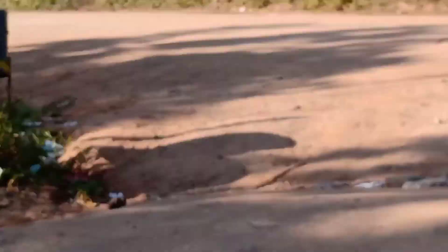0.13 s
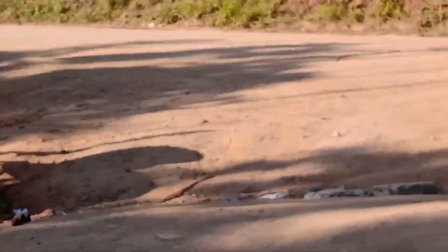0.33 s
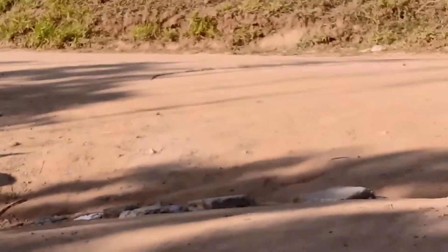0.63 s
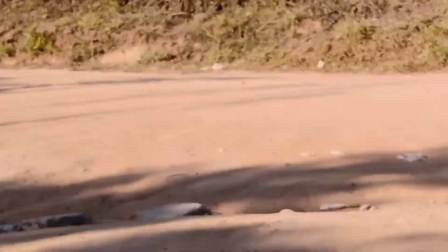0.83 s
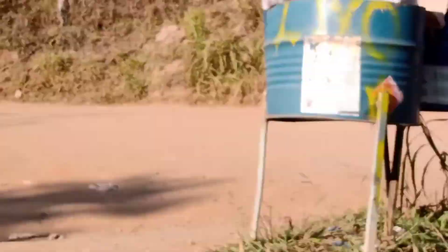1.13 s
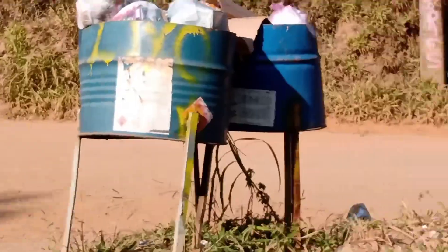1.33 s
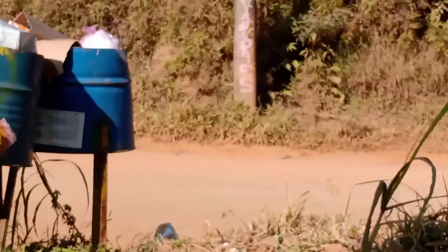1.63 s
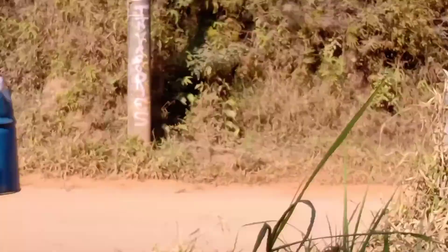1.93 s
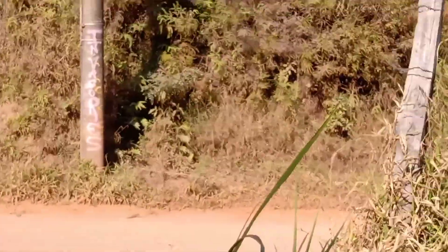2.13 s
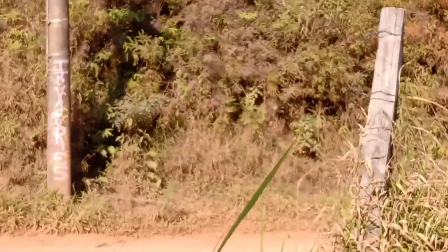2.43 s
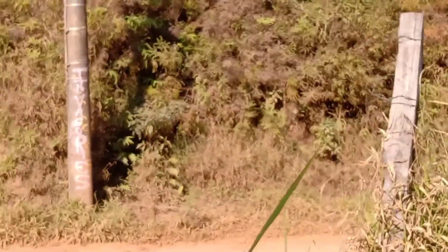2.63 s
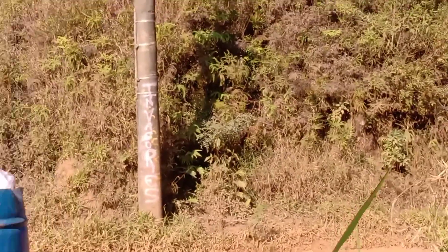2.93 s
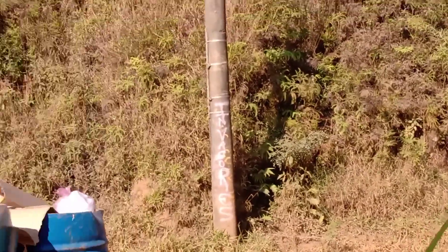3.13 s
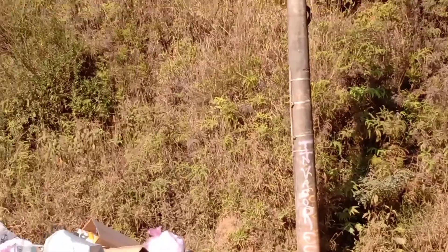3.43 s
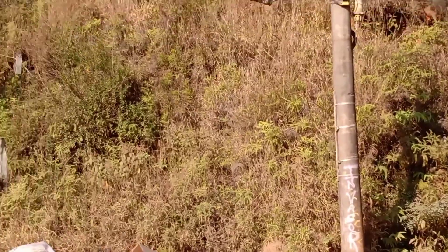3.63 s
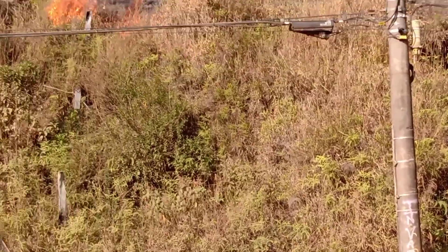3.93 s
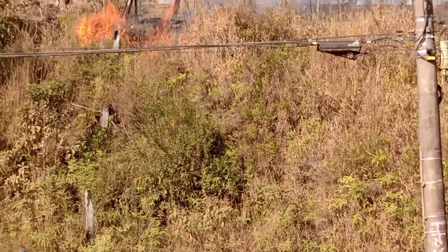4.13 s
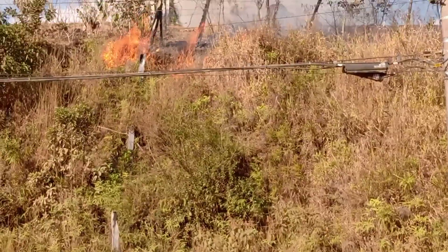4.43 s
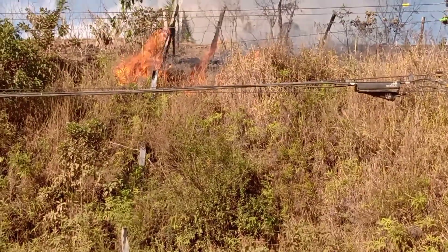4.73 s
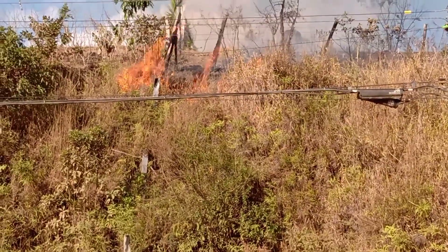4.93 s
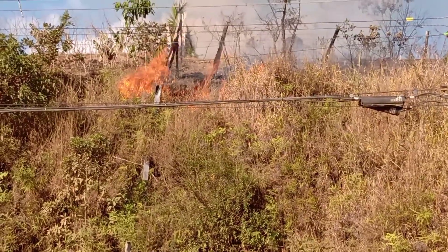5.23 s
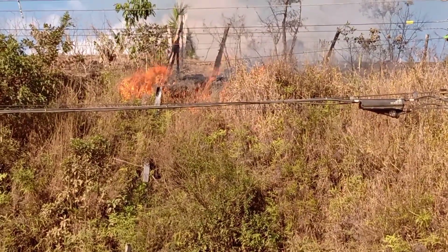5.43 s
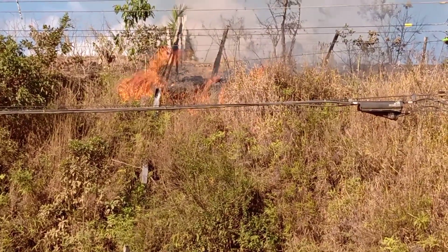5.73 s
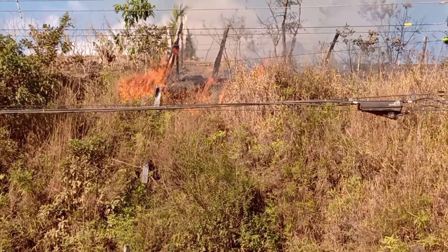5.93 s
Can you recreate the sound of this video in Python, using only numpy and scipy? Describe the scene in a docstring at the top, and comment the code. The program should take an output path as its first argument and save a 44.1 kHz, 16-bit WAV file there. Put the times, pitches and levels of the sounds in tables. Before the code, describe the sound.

Dry grass and brush burn outdoors with dense, irregular crackling and sharp pops over a soft hiss and a low rumble.

```python
"""Sharp pops and busy crackle: dry grass and brush burning up a slope, heard through the two microphone
ports of a turning hand-held camera. Each stalk bursts as a short pressure pulse with a bounce off the
ground and a scatter from the brush, and the slope throws back brief echoes. Swarms of tiny crackles,
sizzling grass blades and a soft hiss fill the gaps over a low outdoor rumble. Early on, the hand
bumps the camera a few times."""
import sys
import numpy as np
from scipy import signal
from scipy.fft import rfft, irfft
from scipy.io import wavfile
from scipy.ndimage import uniform_filter1d

SR = 44100
rng = np.random.default_rng(int(sys.argv[2]) if len(sys.argv) > 2 else 0)


def int16_out(signal):
    """Quantize to a 16-bit WAV file."""
    q = np.round(np.clip(np.atleast_2d(signal).T, -1, 1) * 32767)
    wavfile.write(sys.argv[1], SR, q.astype(np.int16))


N = 268569

# The featured bursting stalks. Each row: start in seconds, midrange level in dB, thump, fizz and sizzle
# in dB before band weighting, scatter in dB against the burst, ring pitch in Hz.
STALK_POPS = [(0.0092, -40.5, 10.5, -4, -10.0, 5, 865), (0.0177, -36, -3, -13, -9, -5, 1630),
              (0.0505, -66, -4, 7.0, 13.0, -3, 5640.0), (0.0572, -51, -10, -2, 7, -18, 840.0),
              (0.0619, -48, -10, 12, 22, -25, 9530.0), (0.078, -33.5, 2.5, -2.0, 17, 7, 2070.0),
              (0.0866, -57, -2, 0.0, 1.0, 3.0, 2500.0), (0.1108, -33.5, -1.5, 5, 13, -3, 790),
              (0.137, -30, -4, 12, 6, -15, 2860), (0.1566, -42, 1, 7, 11, 3, 5000),
              (0.1721, -44.5, 1, 14, 10, -1, 2630.0), (0.182, -39.5, -8, -1, 2, -7, 2000.0),
              (0.2172, -45, 3, 2, -9, -11, 2000), (0.224, -44, -11, -1, 1, 4, 2500),
              (0.2437, -38, -1, 7.0, 2, -3, 2150), (0.257, -35, -9.5, -2, 0, -6, 1480.0),
              (0.2685, -41.5, -0.5, 7, 8, 1, 760.0), (0.3654, -40, -1, 11, 5, 4, 1550),
              (0.3778, -39.5, -2, -11, -5, -15, 1980.0), (0.4127, -42.5, 3, 13, 8.0, 3, 1570.0),
              (0.4219, -47, 6, -1.0, -1, 18, 745), (0.4296, -43.5, 0, 18, 13, -2, 1480.0),
              (0.4438, -39.5, -5, 11, 14, 16, 8450), (0.5373, -46.5, 3.5, 10, 14, 20, 1480.0),
              (0.5683, -35.5, -13, 2, -1, -4, 1670), (0.5848, -38.5, -1, 12, 11, 12, 1980.0),
              (0.6015, -38, -2, 7, 9, 0, 7510.0), (0.6072, -44.5, 1, 1, -2, -4, 1110.0),
              (0.6205, -44, -8, 18, 22, -9, 5030), (0.6912, -41.0, -2, 3, 23, -5, 1880.0),
              (0.7, -41, 8, 18, 18, 12, 774), (0.709, -44, 5, 7, 15, 2, 800),
              (0.7214, -40, 6, -11, 6, 1, 776), (0.7412, -45, 1, 1, 4, -3, 770),
              (0.8019, -43.0, 3, 19, 18, 2, 7880.0), (0.8111, -41.5, -1, 5, 11, 0, 7160.0),
              (0.8583, -33.5, -6.5, 1, -2, 1, 5200), (0.8753, -49, -15, 14, 19, 1, 7000),
              (0.8856, -46.5, -14, 21, 26, -8, 7700), (0.9391, -30, -9.5, -1, -1, -9, 790),
              (1.0167, -48, -11, 21, 22, -11, 8300.0), (1.0441, -39, -6, 10, 6, -11, 1350.0),
              (1.0541, -26.5, -2, 6.5, -9, 6, 3070), (1.0893, -40, -7, 6, 9, 3, 4240.0),
              (1.117, -43, 0, 6, 7, 1, 1300), (1.1491, -44.5, -7, 22, 15, -5, 1880.0),
              (1.157, -47, -13, 21, 8.5, -18, 5920.0), (1.1796, -35.5, -4.5, -11, 3, 9, 1330),
              (1.1902, -32.5, -2, 19, 7, -1, 5750), (1.199, -35, -8, 6, 21, -9, 1270),
              (1.2052, -43, 0, 19, 1, -5.0, 2500.0), (1.2353, -48, -13.0, 14, 15, -10, 5380.0),
              (1.2776, -39, -13, 11.0, 3, -9, 2000.0), (1.3035, -46, -17, 17, 19, -6, 2170.0),
              (1.3224, -32.5, -10, 4, 4.0, 3, 1480), (1.3611, -49, -13.0, 14.0, 11.5, -2, 5920.0),
              (1.3657, -45, -16, 13, 23, -7, 7160.0), (1.373, -42, -5, 0, 7, 7, 1300.0),
              (1.3804, -37.5, -2, -6, 10.0, -2, 2020), (1.3896, -33, -6, 0, -9, -2, 740),
              (1.4127, -44, -16, 3, 3.0, 2, 4040.0), (1.4748, -44, -3, 2, 8, -0.0, 1880.0),
              (1.4951, -37.5, -4, 6, -6.0, 2, 2020), (1.5074, -38, -5, 5, -10, -12, 5920.0),
              (1.5134, -39.5, -4, 6, 14.5, -12, 6500), (1.5274, -44.5, 12, -6, -11, 1, 800),
              (1.5463, -38.5, -11, 0.0, 1.0, 0, 3500.0), (1.5559, -49, 2, 13.0, 22, -13, 5640.0),
              (1.5716, -42.5, 5, 26, 19, -7, 6300), (1.5759, -37.5, -6, -6, 7, 4, 1760),
              (1.7018, -53, -11, 19, 21, -5, 4450.0), (1.718, -39.5, -2, 21.5, 6, -11, 1370),
              (1.7335, -43, -5, 18, 20, -6, 4660.0), (1.7397, -49, -8, 6, 17, -1, 4660.0),
              (1.7447, -43, -3, 4, 4, 5, 1710.0), (1.7502, -45.5, 4.5, 15, 12, -8, 1280),
              (1.7594, -46, -1, 7, 5, 0, 7880.0), (1.8291, -46, -1, 20, 11, -17, 5700),
              (1.8413, -34.5, -5, -11, 5, -3, 1960), (1.8535, -44, 1, 10, 7.0, 5, 5130.0),
              (1.8635, -37, -4, -1, 8, 7, 4800), (1.9271, -43, 0.0, 12, 8, -3, 1800.0),
              (1.9402, -55.5, -8.5, 18.0, 36, -19, 5960.0), (1.9605, -30.5, -8.5, 1, -2, -6, 1840),
              (1.9857, -48.5, -1.0, 18, 32, -5.0, 6830.0), (2.0042, -41, -1, 2, 7.0, -18, 1880.0),
              (2.0158, -43.5, -5, 21, 20, 1, 1980.0), (2.0896, -49, -26, 19, 17, -10, 860.0),
              (2.1029, -37, -8.0, -2, 13, -4, 2140), (2.1284, -45, 2.5, 10, 10.0, 1, 845),
              (2.1469, -50.5, -13, 26, 37, -15, 7700), (2.1766, -42.5, -15, 13, 11, 7, 8900),
              (2.1853, -40, -18, 0, 3.5, -1, 1980.0), (2.1914, -48, 4, 0.0, 0, -13, 2510.0),
              (2.2037, -39.5, -2, 1, 4, 10, 5640.0), (2.2168, -32.5, 2, -7, -2, 7, 2370),
              (2.2308, -33, -8, -13, -3.0, -8, 1980.0), (2.2385, -29.5, -2, -12, -13.5, -4.0, 1480),
              (2.2577, -37, -4, -8, -8, -4, 860.0), (2.2649, -35.5, -5, -11.0, -8.0, -6, 3500.0),
              (2.2809, -36, -2, 0.0, -1, 3, 1880.0), (2.3047, -33, -7, 5, 9, -7, 1870),
              (2.314, -35.5, -7, 14, 3, -4, 1890.0), (2.3227, -33, 1, 8, 6, 3, 3240),
              (2.3418, -39, -13, -1, -6, -5, 1170.0), (2.3499, -40, -12, -2.0, -7.0, -1, 2280.0),
              (2.3972, -47.5, 9.5, -6.0, -7, 0, 3040.0), (2.4319, -41.5, 4, 10, 19, 1, 3340.0),
              (2.4519, -39.5, -11, 5.0, 7.0, -2, 1980.0), (2.4719, -32.5, -10.5, -19, -8.0, -8, 2870),
              (2.4793, -41.5, 0.5, 16, -5, -12, 875), (2.5884, -38.5, -17, 3, 5, 2, 1900.0),
              (2.5951, -45.0, -20, 13, 9.0, -8, 1900), (2.6051, -42, -6, 9, 14, 4, 4450.0),
              (2.6183, -44, 2, 15, 10.0, 10, 840), (2.6539, -32, -7.5, 8, 11, -6, 2960),
              (2.6654, -37, -6, 15, 25, -5, 2600.0), (2.6923, -30, -6, -16, -6, -4, 1890),
              (2.7396, -47.5, -12, 22, 26, -9.0, 3180.0), (2.7675, -44, -12, 19, 18, 4, 1120.0),
              (2.7784, -57, -10, 8, 10, -5.0, 4890.0), (2.7936, -36.5, -5, 0, 5, -3, 2900.0),
              (2.8109, -41.5, -8, 9, 0, -12, 1800.0), (2.8287, -35, -3.5, 4, 1, 10, 3270),
              (2.8364, -34, -8.5, 2, 1, -9, 6340), (2.8526, -44, -2, 10, 2.0, 3, 1120.0),
              (2.8832, -33, -1, -8.0, 2.0, 5, 2270), (2.8909, -28.5, -7.5, -28, -5, -5, 2400),
              (2.8982, -35, -13, 6, -1, -7, 1800.0), (2.9364, -42.5, 2, 11, 17, 6, 6700),
              (3.0269, -31.5, -7.5, -1, 0, 2, 1900), (3.0349, -38, -2.5, 10, 4, -2, 2920),
              (3.0741, -38.5, -8, 2, 2, -1, 2680), (3.1098, -43, -4, 7, 20, -13, 3500.0),
              (3.1273, -52, -6.0, 20, 7.5, -11, 5920.0), (3.1507, -34.5, -14, -2, 15, -5, 7900),
              (3.1619, -42, -4, 22, 23, -24, 5540), (3.1916, -36, -11, 12.5, 25, -10, 5360),
              (3.2159, -41, -8, 6, 13, 1, 2890.0), (3.2355, -38, -1, 11.0, 19, -2, 3180.0),
              (3.2693, -36.5, -2.0, 5, 3.0, -15, 2370), (3.3151, -41.5, -18, 0, -7, -15, 2890.0),
              (3.3377, -44.5, 7, 10, 28, -24, 844), (3.3581, -49, -23, -2, 0, -19, 2500.0),
              (3.3794, -24.5, -10.5, -10.5, -17, 2, 1720), (3.3918, -49.5, 15, 1, 16, -5, 784),
              (3.4141, -35, -14, 4.0, 13, -10, 7160.0), (3.4308, -53, -9.0, 13, 11, -12, 7160.0),
              (3.4436, -42, -20, 8, 20, -16.0, 7880.0), (3.4631, -32, -5, 17, 16, -7, 8000.0),
              (3.4779, -26.5, -9, 8, 9, -7, 3130), (3.4989, -37.5, -13, 10, 10.5, -8, 4930.0),
              (3.5047, -43, -8, 3.0, 13, 3, 860.0), (3.5462, -44.5, -13, 16, 13, -3, 2070.0),
              (3.5549, -44.5, 4, 11, 5, 5, 1480.0), (3.5667, -46.5, 1.5, -2, 16, -9, 8760.0),
              (3.574, -39, -12, 0, 2, 6.0, 6210.0), (3.5979, -35, -21, 7, 6, -6, 2780.0),
              (3.6088, -42, -18, 0, 0, 3.0, 6830.0), (3.6382, -47, -6, 16, 29, -20, 9090.0),
              (3.652, -41, -13, 6, 14, -2, 2800), (3.6622, -38.5, -3, 3, 2, -2, 810.0),
              (3.679, -44, -1, 9, 8, -8, 5130.0), (3.7429, -17, -9, 0, -3, -3, 3270),
              (3.7605, -50, 11, -2, 2, 2, 2500.0), (3.7731, -35, -3, 3, 3, -18, 1800.0),
              (3.7764, -32, -7, 15, 16, -3, 7960), (3.7864, -27, -9, 3, 7, -5, 7700),
              (3.8144, -36, -5, 11.0, 21, -5, 7700), (3.8304, -42, -12.0, 11, 13, -11, 1630.0),
              (3.8475, -38, -11, 1.0, -3, 7, 860.0), (3.8603, -32.5, -4, 12, 22, -6, 2710),
              (3.8749, -34, -13.0, 2, 5, -2, 2340), (3.8883, -42, -7, -2, 5.0, -3, 1120.0),
              (3.8956, -35, -3.5, 4, 14, -2, 1360.0), (3.9156, -38.0, -2.5, 3, -8, 3, 710),
              (3.9422, -38.5, -4, -2, 8, 0, 3370.0), (3.9612, -37, -19, 1, 15, -18, 5700),
              (3.9747, -32.5, -10, -12, -16, 0, 2500), (4.0154, -40, -11, 1, 6.0, 3, 2170.0),
              (4.0225, -40, -7, 10, 13, -11, 2500.0), (4.0252, -39.5, -4, 10, 10, -1, 3520),
              (4.0487, -45.5, -6, 6.0, 14, -1.0, 7880.0), (4.0603, -56, -15, 15, 20, -13, 5920.0),
              (4.0847, -34.5, -2.5, -1, 0.0, -2, 4360.0), (4.094, -47, 0, 7, -3, -7, 780.0),
              (4.1005, -34.5, -8, 9, 23, -13, 1790), (4.1084, -48, 2, 1.0, 3.0, -7, 2500.0),
              (4.1112, -43, -12.5, 15, 19, -15, 5130.0), (4.1204, -36, -9, 3, 12, -4, 3060),
              (4.1451, -34.5, -4, 6, 19, -5, 1080), (4.1689, -46, -19, 11.0, 20, -4, 5380.0),
              (4.2069, -30.5, -12.0, -2, 1, 1, 2870), (4.2222, -33, -7.5, -3.0, -17, -9, 1670),
              (4.2483, -55, -6, 16.5, 22.0, -10.0, 7510.0), (4.2618, -39, -6, -7, 10.0, 1, 1440),
              (4.2855, -44, -1, 15, 9.0, -5.0, 3040.0), (4.2918, -41.5, -4, 1, 10, 2, 3040.0),
              (4.3141, -44, 4, 18, 18, -10, 4630), (4.3224, -35, -2.5, 8.5, 11, 2, 6950),
              (4.3521, -32.5, -5.0, 9, 0.0, -5, 2370), (4.3776, -39, -2, -2, -6.0, 11, 1500.0),
              (4.3872, -45, -12, 2, 10.0, 2, 5130.0), (4.3994, -28.5, -9, 0, 1, -2, 1380),
              (4.4165, -38, -12.0, 10, 1.5, 5, 3530), (4.427, -47, -4, 10.0, 6.0, 1, 3500.0),
              (4.438, -48, -11, 15, 12.0, 2, 6210.0), (4.4478, -36, -9, -8, -2, 1, 1470),
              (4.4804, -28.5, -8, 9, 6, -1, 3550.0), (4.4871, -55, -11, 7.0, 8.5, -6.0, 1710.0),
              (4.506, -41, 0, -3, 3, 1, 1500), (4.51, -28, -9, -5, 0, -10, 1350),
              (4.5306, -36, -11, 3, 3, 4, 7160.0), (4.5679, -43, -9, 9.0, 15.0, -23, 8260.0),
              (4.5801, -37, -13.5, 0.0, 10, 11, 2760.0), (4.587, -33.5, -13, 12, -3.0, -8, 5800),
              (4.6154, -37, -6.0, 9, 1, 6, 1350.0), (4.6494, -28, -6, 1, 2, -10, 1410.0),
              (4.6726, -30.5, -2.5, 6, -14, -5, 2890.0), (4.6925, -46.0, -5, 21, 12, 5, 7500),
              (4.7156, -35.5, -5, 3.0, 1, 9, 2280.0), (4.7232, -31.5, -9.5, 3, -11, -10, 2780.0),
              (4.7727, -48, -16, 20, 23, 1, 7510.0), (4.7782, -39, 3.5, 2, 7, 18, 1110.0),
              (4.7915, -24.5, -13.0, 0, 2, -2.5, 1200), (4.8067, -46, -11, 14, 3.0, -7, 2500.0),
              (4.8692, -39.5, -10, -4, -7, -6, 2240), (4.9001, -43.5, 3.5, 3, 8, 1, 1480.0),
              (4.9619, -39.5, -10, -1, -3, -9, 3500.0), (4.9819, -51, -17, 14, 12.0, -7.0, 5380.0),
              (4.9889, -49, -7, 26, 31, -8, 8670.0), (5.0129, -25, -7, 6, -11, -7, 3440),
              (5.0247, -44, -14, -7, -1, -6, 2170.0), (5.0364, -45, -30, 11, 18, -19.0, 2510.0),
              (5.0545, -29.5, -9, -7, -7, -3, 4000), (5.0861, -44, -1, -5, 8, -5, 2760.0),
              (5.1103, -45, -7, 8, -11, -6, 1480.0), (5.1175, -29, -3.5, 8, 13, -5.5, 4240),
              (5.206, -37.5, -12, -8, 3, -9, 5600.0), (5.22, -42, -29, -3.0, 21, -11, 3040.0),
              (5.2282, -26.5, -8.5, -1, -19, -4.5, 3370.0), (5.2483, -34, -15, 2, -11.0, -2, 4000),
              (5.2611, -40, -5, 8, 3, -1, 1880.0), (5.2814, -41.5, -5, 12, 20, -8, 6960),
              (5.315, -43, -5, 8, 8, -3, 5640.0), (5.3478, -41.5, 1, 9, 18, -4, 5800),
              (5.4036, -38, -20, 4, -1, -18.0, 4660.0), (5.4139, -35, -7, 6, 20, 1, 2280),
              (5.4242, -46.5, -9, 32, 8, 8, 5530.0), (5.449, -45.5, 5.5, 10, -1.0, 18, 1060),
              (5.5161, -45.5, -4, -14, 2, -11, 2000), (5.5233, -38, -4, -9, 10, 10, 2840),
              (5.579, -43.5, -1, -9, -2, -13, 1480.0), (5.5907, -43, -11, -11, 1, -2.0, 6830.0),
              (5.5954, -40.0, 0, -5, 2, 1, 1710.0), (5.6223, -38, 0, 17, 14, -11, 2130),
              (5.6306, -31.5, -1, 11, 7.0, -3, 6070), (5.6407, -37.5, -3, -12, 0, 8, 2760.0),
              (5.661, -32, -0.5, 8, 2, -14, 1150), (5.6921, -35.5, -7, 4, -9.0, 0, 1030),
              (5.7374, -43.0, -7, 1, 7, 1, 5130.0), (5.7517, -43.5, 3.5, -6.0, -7.0, -6, 1130.0),
              (5.8059, -30.0, -11.5, -11, -4, 1, 1330), (5.8185, -41, -19, 10, 16, 1, 5130.0),
              (5.8254, -21, -8, 8, 5, -6.5, 2930), (5.8548, -54, -7, 14, 10, -6, 8000),
              (5.8611, -39, 1, 1.0, 3.0, 1, 2500.0), (5.866, -39, -1, 16, 10, -5.0, 5700.0),
              (5.8754, -25, -9, -2, -1, -7, 1720.0), (5.8924, -27.5, -2, -6, 11, -2, 2330),
              (5.9, -39.5, -5, 17, 20.0, -14, 8340), (5.9089, -44.5, -11, 12.0, 20, -5, 8300.0),
              (5.9202, -25.5, -14.5, 1, -3, -9, 2780), (5.9295, -40.0, -13, 10, 5, -2, 5380.0),
              (5.9749, -34.5, -8.5, 1, -4, -8, 1410.0), (6.0086, -42.5, -19, 3, -7.0, -24, 2170.0),
              (6.0519, -46, -14, -7, -8, -20, 2280.0)]
# The camera's turn. Each row: time in seconds, lag of the left port in samples,
# left-minus-right pan in dB before band weighting.
CAMERA_HEADING = [(0, 18.5, -12.5), (.4, 14, -11.5), (.8, 7.5, -10.5), (1.1, 4, -7), (1.5, -5, -6),
                  (1.9, -7, -5.5), (2.4, -9.5, -4.5), (2.9, -7.5, -4.5), (3.3, -6, -4.5), (3.8, -2.5, -4.5),
                  (4.2, -2, -4.5), (5, -2.5, -2.5), (6.1, -3.5, 2)]
# How lively the flames are. Each row: time in seconds, base level of the fine crackle in dB.
BLAZE = [(0.0, -43.5), (0.39, -53.5), (1.24, -48.5), (1.37, -52.5), (1.51, -53.5), (1.78, -51.5),
         (2.28, -46), (2.53, -47.5), (2.75, -46), (3.15, -48.5), (3.34, -46), (3.93, -48.5), (4.16, -49.5),
         (4.58, -48.5), (4.75, -44.5), (5.63, -51), (5.75, -52), (6.09, -48.5)]
# Decay of the slope's echoes. Each row: frequency in Hz, seconds to fall 60 dB.
SLOPE_DECAY = [(500, 0.057), (2500, 0.058), (8000, 0.085), (14000, 0.077)]
# Tone of the hiss and of the rumble. Each row: frequency in Hz, relative level in dB.
HISS_TONE = [(300, -39), (500, 13), (1000, -3), (2500, 13), (7500, 9), (10000, -3), (13500, 0),
             (16500, -23)]
RUMBLE_TONE = [(30, -11), (62, 6), (100, -1.5), (250, -6), (350, -6.5), (470, -13.5), (700, -24),
               (1200, -64)]
# The rumble's slow swell. Each row: time in seconds, gain in dB.
RUMBLE_SWELL = [(0, -4.5), (1, -4), (2, -5.5), (2.8, -2.5), (3.4, -1), (4, -2), (5, -4), (6.1, -3)]
# How alike diffuse sound is at the two ports. Each row: frequency in Hz, correlation from 0 to 1.
PORT_LIKENESS = [(60, 0.99), (300, 0.84), (1000, 0.24), (3000, 0.061), (10000, 0.06)]
# The hand bumping the camera. Each row: start in seconds, level in dB before the envelope, pitch in Hz.
HAND_BUMPS = [(0.094, -42, 100), (0.275, -47, 133), (0.714, -45, 116), (1.523, -46, 260)]
# The ports' unequal colour. Each row: frequency in Hz, left minus right in dB.
PORT_COLOUR = [(400, -.5), (900, 0.5), (1250, 5), (1700, 5.5), (2600, 4), (3400, 1.5), (4300, -2.5),
               (5800, 0), (7200, -3.5), (8600, 1), (12000, 3), (16000, 7)]
# A dip near 470 Hz, and three resonances of the camera body. Each row: centre in Hz, width in Hz, gain in dB.
CAMERA_BODY = [(471, 110, -7.5), (677, 87, 4), (3010, 154, 2), (8430, 2700, 2)]

SIZE = 2048  # samples in one crack or filter response
SIDES = np.array([.5, -.5])  # left and right share of a difference between the ports


def gain_of(db):
    """Decibels to gain."""
    return 10 ** (np.asarray(db) / 20)


def unit_rms(x):
    """Scales to rms 1."""
    return x / np.sqrt(np.mean(x ** 2) + 1e-20)


def at_hz(points, hz):
    """Reads a spectrum table on a log-frequency axis."""
    f, value = np.transpose(points)
    return np.interp(np.log(hz + 1), np.log(f + 1), value)


def at_time(curve, s, column=1):
    """Reads a curve in time."""
    return np.interp(s, np.transpose(curve)[0], np.transpose(curve)[column])


def causal(db):
    """Spectrum with gain db whose ringing starts only after the hit."""
    cepstrum = irfft(db * np.log(10) / 20, SIZE)
    cepstrum[..., 1:SIZE // 2] *= 2
    cepstrum[..., SIZE // 2 + 1:] = 0
    return np.exp(rfft(cepstrum))


def stalk_burst(noise, level_db, hz, t, tear_s):
    """A pressure pulse wrapped in tearing fibres: big stalks burst cleanly, small ones rip."""
    fibres = noise * gain_of(-60 * abs(t - tear_s) / 0.0047)
    fibres = rfft(fibres / np.linalg.norm(fibres, axis=1, keepdims=True))
    fibres *= np.exp(2j * np.pi * hz * tear_s)  # centres the tearing on the pulse
    ragged = np.clip(0.3 - 0.029 * (level_db + 35.5), 0.1, 1)
    return 1 / (1 + 1j * hz / 9000) + ragged * fibres * hz / np.hypot(hz, 1500)


def ground_bounce(jitter, hz):
    """One dull slap about 2 ms late: soft soil swallows the treble."""
    delay_s = 0.002276 * (1 + 0.194 * jitter)
    return 0.37 * np.exp(-2j * np.pi * hz * delay_s) / (1 + (hz / 4500) ** 2)


def brush_scatter(noise, hz, t):
    """Reflections from thin twigs gather just after the burst and die fast, with little bass."""
    twigs = noise * gain_of(4 * noise[:, :1, ::-1])  # a few twigs reflect more than the rest
    twigs = twigs * gain_of(-60 * t / 0.021) * np.clip(t / 0.0012, 0, 1) ** 2
    twigs = rfft(twigs / np.linalg.norm(twigs, axis=2, keepdims=True)) * hz / np.hypot(hz, 500)
    shared = 0.47 + 0.58 / (1 + (hz / 1500) ** 2)  # long waves reach both ports alike
    return shared * twigs[:, :1] + np.sqrt(abs(1 - shared ** 2)) * twigs[:, 1:]


def stalk_cracks(rows, tear_s=.003, ring_db=6, ring_width=0.14, push_hz=1900):
    """One crack a row: burst, bounce and scatter, coloured by the hollow stalk and panned."""
    s, level_db, thump, fizz, sizzle, scatter_db, ring_hz = np.transpose(rows)[:, :, None]
    hz, t = np.fft.rfftfreq(SIZE, 1 / SR), np.arange(SIZE) / SR
    pan = at_time(CAMERA_HEADING, s, column=2) + rng.standard_normal(s.shape)  # stalks lie scattered
    noise = rng.standard_normal((len(rows), 3, SIZE))

    def bands(*values):
        return at_hz(list(zip((60, 350, 900, 2600, 6500, 11500, 16000), values)), hz)

    colour_db = (bands(-42, -3.5, 0.29, 0, -6, -11.5, -33)
                 + thump * bands(2.75, 1.4, 0.94, 0, 0, 0, 0)
                 + fizz * bands(0, 0, 0, 0, 0.79, 0, 0)
                 + sizzle * bands(0, 0, 0, 0, 0, 0.76, 0.87)
                 + ring_db / (1 + ((hz / ring_hz - 1) / ring_width) ** 2))
    burst = stalk_burst(noise[:, 2], level_db, hz, t, tear_s)
    bounce = gain_of(scatter_db) * ground_bounce(noise[:, 0, :1], hz)
    scatter = gain_of(scatter_db + 1)[:, None] * brush_scatter(noise, hz, t)
    spectra = ((burst + bounce)[:, None] + scatter) * causal(colour_db)[:, None]
    spectra *= (1j * hz - push_hz) / (1j * hz + push_hz)  # a short push, then a deeper suction
    mids = spectra[..., (hz > 1500) & (hz < 4500)]  # the midrange sets each crack's level
    spectra /= np.sqrt(np.sum(abs(mids) ** 2, axis=(1, 2), keepdims=True) / SIZE / (.002 * SR))

    # The camera body delays the far port and shades its treble most.
    port_lag = at_time(CAMERA_HEADING, s) + 1.29 * noise[:, 1, :1]
    lag = port_lag[:, None] * SIDES[:, None] + 13.9 + tear_s * SR
    shade_db = bands(.1, 0.08, 0.027, 0.45, 0.22, 0.84, 1.45) * pan[:, None] * SIDES[:, None]
    spectra *= gain_of(level_db[:, None] + shade_db) * np.exp(-2j * np.pi * hz * lag / SR)
    starts = np.round((s[:, 0] - tear_s) * SR).astype(int) + SIZE - 24
    out = np.zeros((2, N + 2 * SIZE))
    for start, crack in zip(starts, irfft(spectra)):
        out[:, start:start + SIZE] += crack
    return out[:, SIZE:SIZE + N]


def fine_crackle(per_second=200):
    """Small stalks burst at random moments; most are faint and bright, a few stand out."""
    count = int(per_second * N / SR)
    s, luck = rng.uniform(0, N / SR, count), rng.standard_normal((5, count))
    level_db = at_time(BLAZE, s) - 10.5 + 3.5 * np.minimum(rng.exponential(1, count), 3.5)
    thump, fizz = -7 + 4 * luck[0], 3 + 5 * luck[1]
    sizzle, scatter_db = fizz + 4 * luck[4], 1.5 + 3 * luck[2]
    # More fizz against thump lowers the ring; the spread often takes it out of hearing.
    ring_hz = 2780 * 2 ** (-1.6 * (fizz - thump - 10.5) + 0.44 * luck[3])
    return stalk_cracks(np.c_[s, level_db, thump, fizz, sizzle, scatter_db, ring_hz])


def slope_echoes(fire):
    """Sparse echoes of random sign off the bushes and the bank, each band dying at its own speed."""
    taps = np.zeros((3, SR // 4))
    slots = np.arange(300, SR // 4 - 20, 20)
    arrivals = slots + rng.integers(0, 20, (3, len(slots)))
    np.put_along_axis(taps, arrivals, rng.choice([-1., 1.], arrivals.shape), 1)
    hz, t, spectra = signal.stft(0.34 * taps[0] + 1.4 * taps[1:], SR, nperseg=256)
    decay = gain_of(-60 * t / at_hz(SLOPE_DECAY, hz)[:, None])
    tail = signal.istft(spectra * decay, SR, nperseg=256)[1]
    return signal.fftconvolve(fire, tail / np.linalg.norm(tail[0]), axes=1)[:, :N]


def diffuse_noise(tone, patch_db, blaze_share, spurt_db):
    """Wide noise at rms 1 with drifting patches and treble spurts, partly riding the blaze."""
    frames, hz = N // 256 + 5, np.fft.rfftfreq(1024, 1 / SR)
    left_re, left_im, own_re, own_im, patches = rng.standard_normal((frames, 513, 5)).T
    patches = unit_rms(uniform_filter1d(uniform_filter1d(patches, size=45, axis=0), size=7, axis=1))
    flicker = unit_rms(uniform_filter1d(rng.standard_normal(frames), size=5))
    spurts = np.outer(hz ** 2 / (hz ** 2 + 8000 ** 2), flicker)
    blaze_db = at_time(BLAZE, np.arange(frames) * 256 / SR)
    motion_db = patch_db * patches + spurt_db * spurts + blaze_share * (blaze_db - blaze_db.mean())
    shared = at_hz(PORT_LIKENESS, hz)[:, None]
    left = left_re + 1j * left_im
    right = shared * left + np.sqrt(1 - shared ** 2) * (own_re + 1j * own_im)
    spectra = np.array([left, right]) * gain_of(at_hz(tone, hz)[:, None] + motion_db)
    return unit_rms(signal.istft(spectra, nperseg=1024, noverlap=768)[1][:, :N])


def grass_sizzle(per_second=1500, spread_db=3.5, clump_db=4.5):
    """Countless grass blades tick in clumps, each a few cycles at its own pitch and place; rms 1."""
    s, t = np.arange(N) / SR, np.arange(200) / SR
    clumps = unit_rms(uniform_filter1d(rng.standard_normal(N), size=900))
    sizes = gain_of(spread_db * np.minimum(rng.exponential(1, N), 4))
    hits = sizes * (rng.random(N) < per_second / SR) * gain_of(clump_db * clumps + at_time(BLAZE, s))
    blade, out = rng.integers(0, 16, N), np.zeros((2, N))
    for k, hz in enumerate(rng.permutation(np.geomspace(900, 11000, num=16))):
        tick = np.exp(-t * hz * 1.14) * np.sin(2 * np.pi * hz * t) * np.sqrt(hz)
        ticks = signal.oaconvolve(hits * (blade == k), tick)[:N]
        for port, side in enumerate(SIDES):
            lag = np.round(side * (at_time(CAMERA_HEADING, s) + k % 5 - 2)).astype(int)
            out[port] += ticks[np.clip(np.arange(N) - lag, 0, N - 1)]
    return unit_rms(out)


def hand_bumps():
    """The hand nudges the camera: a short, dull swing, alike in both ports."""
    out, t = np.zeros(N), np.arange(3000) / SR
    envelope = np.clip(t / 0.0063, 0, 1) * gain_of(-60 * t / 0.053)
    for s, db, hz in HAND_BUMPS:
        out[round(s * SR):][:len(t)] += gain_of(db) * envelope * np.sin(2 * np.pi * hz * t)
    return out


def scene():
    """Pops and crackle up front with their echoes, over hiss, sizzle, rumble and a few bumps."""
    fire = stalk_cracks(STALK_POPS) + fine_crackle()
    echoes = gain_of(-11.5) * slope_echoes(fire)
    hiss = gain_of(-60) * diffuse_noise(HISS_TONE, patch_db=5.3, blaze_share=0.29, spurt_db=6.5)
    sizzle = gain_of(-60) * grass_sizzle()
    rumble = diffuse_noise(RUMBLE_TONE, patch_db=1.5, blaze_share=0.088, spurt_db=-2)
    rumble *= gain_of(-61.5 + at_time(RUMBLE_SWELL, np.arange(N) / SR))
    return fire + echoes + hiss + sizzle + rumble + hand_bumps()


def record(dry):
    """The camera's colour: body resonances, unequal ports, a bass cut and a steep top cut."""
    hz = np.fft.rfftfreq(SIZE, 1 / SR)
    body_db = sum(db / (1 + (2 * (hz - centre) / width) ** 2) for centre, width, db in CAMERA_BODY)
    ports = irfft(causal(body_db + np.outer(SIDES, at_hz(PORT_COLOUR, hz))))
    heard = signal.oaconvolve(dry, ports, axes=1)[:, :N]
    heard = signal.sosfilt(signal.butter(3, 52, "high", fs=SR, output="sos"), heard)
    top_cut = signal.firwin(511, 16650, window=("kaiser", 9), fs=SR)
    return signal.oaconvolve(heard, top_cut[None], "same")


dry = scene()
out = record(dry)
int16_out(out)
```